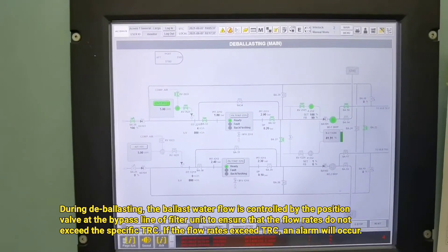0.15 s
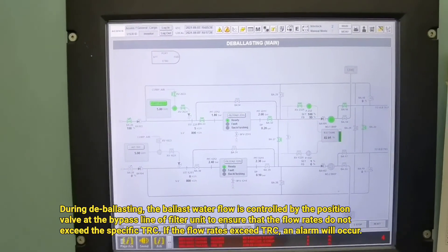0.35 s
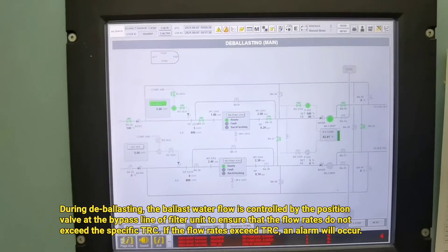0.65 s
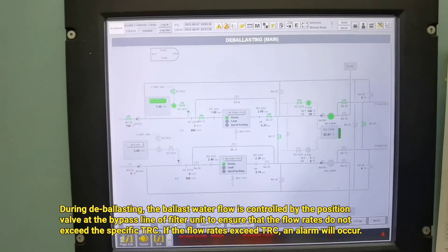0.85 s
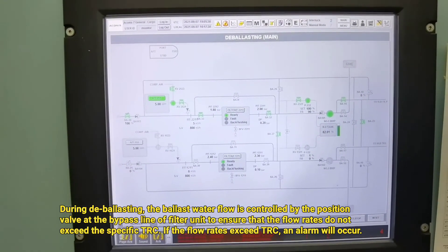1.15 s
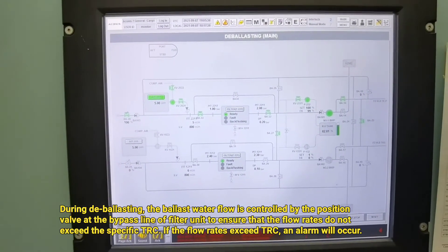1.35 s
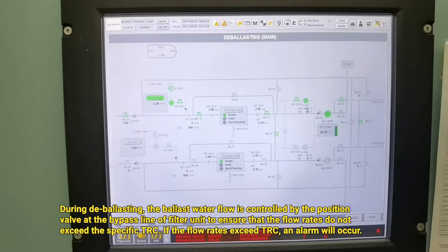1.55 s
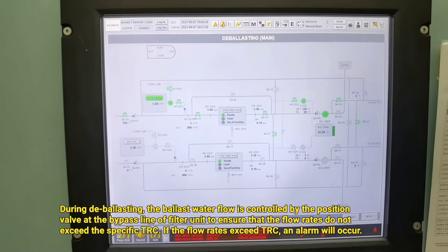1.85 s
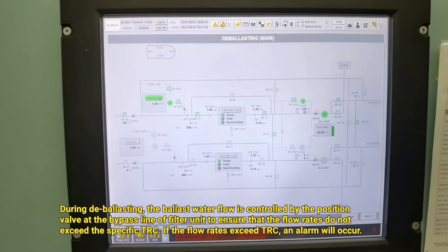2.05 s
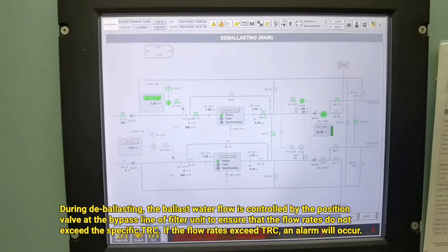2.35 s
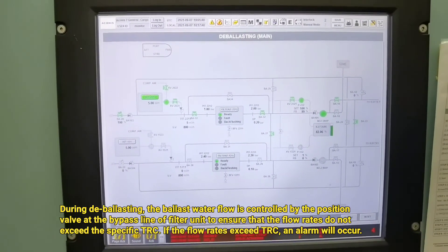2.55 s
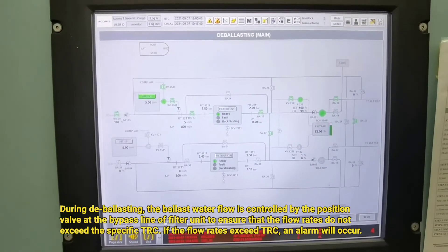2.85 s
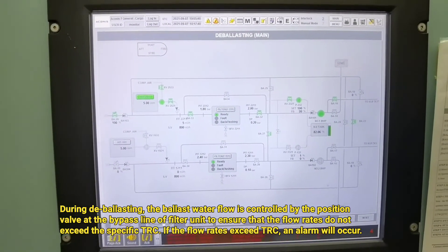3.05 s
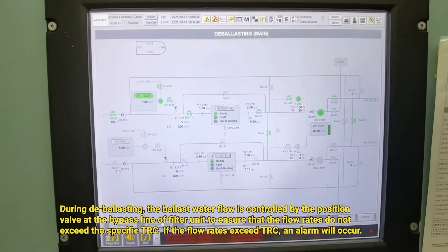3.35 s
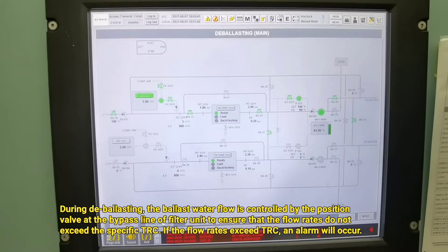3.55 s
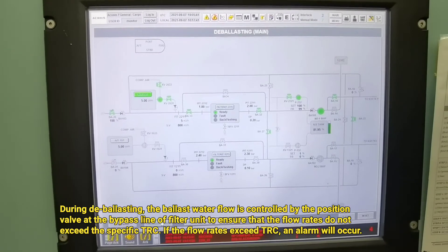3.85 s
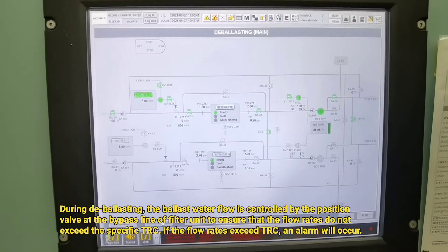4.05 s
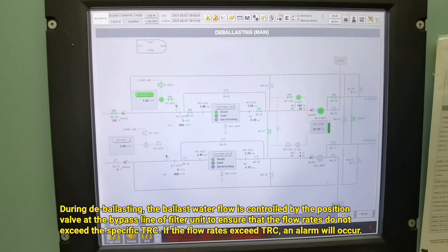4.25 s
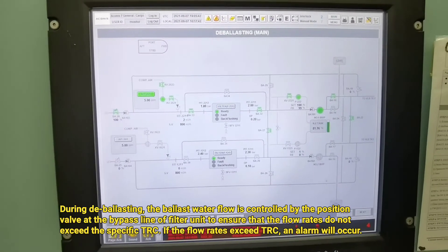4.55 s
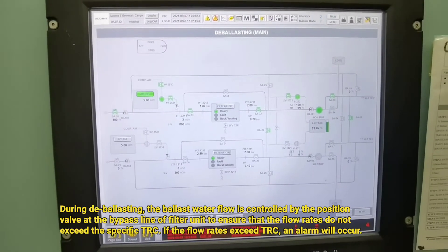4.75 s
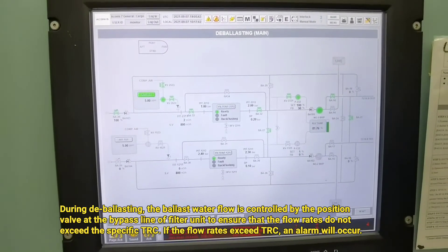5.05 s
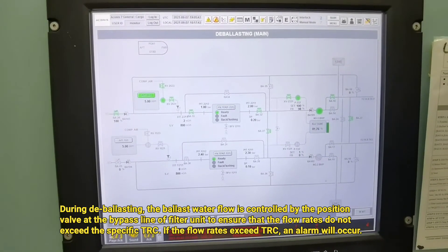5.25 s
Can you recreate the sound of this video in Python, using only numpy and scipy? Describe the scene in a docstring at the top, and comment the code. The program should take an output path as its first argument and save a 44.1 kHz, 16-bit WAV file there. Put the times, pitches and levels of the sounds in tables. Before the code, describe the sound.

Continuous ship machinery noise begins at once and runs to the end. Narrow low booms rise and sink by chance over a steady hollow room hum and finely coloured cooling-air hiss. The deepest rumble vanishes abruptly near halfway; everything else goes on. Handheld stereo pickup before a control screen indoors, bass mostly common and slightly left, hiss spread wide. No alarm or handling sounds.

```python
"""A small steel-walled machinery control space on a ship, heard through a two-port microphone.
Booms: noise through narrow low resonances (pump and fan rumble), swelling unevenly; weaker ones sound evenly.
Rumble: deep resonant noise, wavering, whose lows are cut off abruptly half way.
Air: broad noise and resonant cooling-air hiss, finely combed.
Bass is nearly alike at both ports; the hiss is only slightly alike, by a phase-scattered share of left in right."""
import sys
import numpy as np
from scipy import signal
from scipy.fft import rfft, irfft
from scipy.io import wavfile
from scipy.ndimage import uniform_filter1d

SR = 44100
rng = np.random.default_rng(int(sys.argv[2]) if len(sys.argv) > 2 else 0)


def makeup_ratio(level_db):
    """Linear amplitude ratio for a level in decibels (20 dB per factor of ten)."""
    decades = np.asarray(level_db, float) / 20
    return 10 ** decades


def dump_mix(stems):
    """Bounce the given channels to the path in sys.argv[1] as a 16-bit WAV at rate SR."""
    frames = np.atleast_2d(stems).T  # one column per channel
    limited = np.clip(frames, -1, 1)  # hard clip at full scale
    pcm = np.round(limited * 32767).astype(np.int16)
    wavfile.write(sys.argv[1], SR, pcm)


N = 237960
T = np.arange(N) / SR
HZ = np.arange(N // 2 + 1) * SR / N + 1e-3  # offset keeps the logarithms finite
SIDES = np.array([[1], [-1]])  # left, right
# balance of room and air noise: (frequency [Hz], left minus right [dB])
BALANCE = [(60, 3.0), (110, 0), (200, 12), (380, -0.5), (700, 3), (1290, 1.5), (2380, 2), (4400, 1.5),
           (8120, 0.5), (15000, 2)]


def read(table):
    """Reads a (Hz, value) table at every spectrum bin, linear in log frequency."""
    hz, value = np.transpose(table)
    return np.interp(np.log(HZ), np.log(hz), value)


def resonances(modes, steep):
    """Amplitude response of unrelated resonances, powers added; steep sets the fall of the skirts."""
    power = 0
    for hz, width_hz, db in modes:
        detuning = 2 * (HZ - hz) / width_hz
        power = power + makeup_ratio(2 * db) / (1 + detuning ** 2) ** steep
    return np.sqrt(power)


def noise(shape, pan_db):
    """Two-port noise of the given colour, mid rms 1; likeness splits power between mid and side."""
    # port likeness: (frequency [Hz], left-right likeness [0-1])
    likeness = [(60, 0.9), (130, 0.98), (290, 0.92), (640, 0.6), (1410, 0), (3100, 0.08), (6820, 0),
                (15000, 0)]
    like = np.clip(read(likeness), 0, 1)
    mid, side = rfft(rng.standard_normal((2, N)))
    ports = np.sqrt(1 + like) * mid + SIDES * np.sqrt(1 - like) * side
    pair = irfft(shape * makeup_ratio(SIDES * pan_db / 2) * ports, N)
    return pair / pair.mean(0).std()


def steady(pair, hold_s):
    """Evens out slow chance swells of a narrow noise by its smoothed power; quick beating stays."""
    k = int(hold_s * SR)
    power = uniform_filter1d(uniform_filter1d(pair.mean(0) ** 2, k), k)
    return pair / np.sqrt(power + 0.038)


def walk(rate_per_s):
    """Random levels held 1 / rate s and smoothed twice over that time; mean 0, spread 1."""
    k = int(SR / rate_per_s)
    held = np.repeat(rng.standard_normal(N // k + 1), k)
    w = uniform_filter1d(uniform_filter1d(held, k), k)[:N]
    return (w - w.mean()) / w.std()


def booms():
    """Four groups of strong resonances swell by chance; lower and main share a throb and wander in pan."""
    # inner booms, before throb and swell: (time [s], lower level [dB], main level [dB])
    inner_levels = [(0.0, -37, -16.5), (0.33, -16, -14), (1.2, -27.5, -23), (1.4, -20.5, -17.5),
                    (1.52, -31.5, -30), (1.86, -17.5, -11), (2.0, -15.5, -19), (2.1, -28, -13),
                    (2.16, -21, -17.5), (2.8, -25, -21), (2.99, -21, -12), (3.25, -32, -19),
                    (3.29, -22.5, -20.5), (3.65, -18.5, -16.5), (3.71, -33, -33.5), (3.76, -19, -17.5),
                    (4.0, -24, -22), (4.21, -37, -13.5), (4.27, -19, -13), (4.33, -39, -35.5),
                    (4.42, -36, -21), (4.84, -19, -22), (4.88, -53, -20), (5.4, -18, -23.5)]
    # outer booms, before swell: (time [s], lowest level [dB], upper level [dB])
    outer_levels = [(0, -30.5, -30), (.65, -28.5, -27.5), (1.0, -30, -34), (1.3, -36, -30.5),
                    (1.6, -35, -37.5), (1.9, -35.5, -30), (2.3, -38, -34.5), (2.7, -37, -28.5),
                    (3.1, -32.5, -30.5), (3.6, -34, -32), (4.1, -36, -31.5), (4.45, -37.5, -36.5),
                    (4.85, -30.5, -33.5), (5.4, -41, -33)]
    # resonances of lowest, lower, main, upper boom: (frequency [Hz], width [Hz], relative level [dB])
    boom_modes = [
        [(92, 4.2, -1), (110, 22, -4.5)],
        [(166.54, 9.6, 0.5), (144, 25, -16)],
        [(185.1, 8.7, -2), (197.65, 11.1, -2), (207, 7.8, -15)],
        [(293.6, 6.5, 1.5), (289, 49, 0.5), (269.2, 42, -11)],
    ]
    # fixed balance of the outer booms: lowest, upper (left minus right [dB])
    outer_pan_db = [2.5, 1]
    # slow balance of the inner booms: (time [s], left minus right [dB])
    inner_pan = [(0, 5.5), (.7, 1.5), (1.2, 9), (1.7, 3.5), (2.7, 7.5), (3.7, 6), (4.3, 3), (4.8, 6.5),
                 (5.4, -1)]
    # chance swelling, lowest to upper: (rate [levels/s], spread [dB])
    swell = [(10, 2.5), (14, 2), (8, 1.46), (12, 2.5)]
    throb_db, throbs_per_s = 2.5, 26

    s, *inner = np.transpose(inner_levels)
    lower, main = (np.interp(T, s, c) for c in inner)
    s, *outer = np.transpose(outer_levels)
    lowest, upper = (np.interp(T, s, c) for c in outer)
    wander_db = np.interp(T, *np.transpose(inner_pan)) + 1.55 * walk(9)
    pans = outer_pan_db[0], wander_db, wander_db, outer_pan_db[1]
    throb = throb_db * walk(throbs_per_s)
    levels = lowest, lower + throb, main + throb, upper
    out = 0
    for modes, db, pan_db, (rate_per_s, spread_db) in zip(boom_modes, levels, pans, swell):
        gain = makeup_ratio(db + spread_db * walk(rate_per_s) + SIDES * pan_db / 2)
        drive = gain * steady(noise(resonances(modes, steep=1.36), 0), hold_s=0.072)
        # the swelling drive passes wider resonances again, which keeps each boom narrow
        wider = [(hz, 2.86 * width_hz, mode_db) for hz, width_hz, mode_db in modes]
        boom = irfft(rfft(drive) * resonances(wider, steep=1.24), N)
        out = out + boom * drive.std() / boom.std()
    return out


def room():
    """Noise through the weaker resonances of room and casings, at a constant level."""
    # (frequency [Hz], width [Hz], relative level [dB])
    room_modes = [(135, 16.3, -0.5), (327.6, 10.3, -2), (349, 21, -5), (381, 27, -5), (413, 21, -4),
                  (447, 41, -11.5), (555, 64, -13.5), (593, 18, -8), (618, 51, -17), (654.7, 27, -8.5),
                  (695, 20, -17), (724.5, 10, -11.5), (870, 35, -15.5), (891, 18, -15.5), (890, 22, -24),
                  (1010, 25, -27.5), (1083, 47, -16.5)]
    level_db = -32.5
    return makeup_ratio(level_db) * noise(resonances(room_modes, steep=1.5), read(BALANCE))


def rumble():
    """Deep resonant noise that wavers; its lows are cut off abruptly half way, over 12 ms."""
    # (frequency [Hz], width [Hz], relative level [dB])
    rumble_modes = [(27, 7, -6), (43, 10, 3), (56, 14, -10), (70.5, 11, -.5)]
    # strength before wavering: (time [s], level [dB])
    rumble_levels = [(0, -35), (.35, -34), (.9, -37), (1.3, -42), (1.7, -33), (2.0, -38), (2.5, -43),
                     (2.7, -36)]
    cut_s, pan_db = 2.725, 6
    lows_kept = np.clip((cut_s - T) / .012, 0, 1)
    lows = steady(noise(resonances(rumble_modes, steep=1.4), pan_db), hold_s=.15)
    level_db = np.interp(T, *np.transpose(rumble_levels)) + 1.2 * walk(8)
    return lows_kept * makeup_ratio(level_db) * lows


def air():
    """Air and motor noise plus resonant hiss, finely combed by the steel walls; octaves flicker a little."""
    # broad air and motor noise: (frequency [Hz], relative level per Hz [dB])
    air_colour = [(25, -3), (60, -4), (90, -8), (250, 3), (500, -2.5), (800, -4), (1300, -4), (1600, -6.5),
                  (2000, -3), (2600, -7), (3800, -7.5), (5200, -4.5), (9000, -8.5), (11000, -10),
                  (12000, -36), (15500, -6)]
    # cooling-air hiss: (frequency [Hz], width [Hz], relative level [dB])
    hiss_modes = [(4440, 490, -14.5), (5580, 153, -6), (5990, 140, -4.5), (6580, 400, -6), (6890, 154, 1.5),
                  (7290, 240, 3), (7700, 250, -4.5), (8100, 170, -1), (8580, 170, -5), (8760, 600, -5),
                  (9880, 1170, -8.5), (12600, 500, -16), (13800, 500, -20)]
    air_db, hiss_db, scatter_db = -35.5, -33, -9
    tail_t60_s, scatter_t60_s = 0.3, 0.04

    tail = rng.standard_normal((2, N)) * np.exp(-np.log(1000) * T / tail_t60_s)
    comb = np.abs(rfft(tail)) ** 0.57  # exponent makes the comb shallower
    broad = makeup_ratio(air_db) * noise(comb * makeup_ratio(read(air_colour)), read(BALANCE))
    hiss = makeup_ratio(hiss_db) * noise(comb * resonances(hiss_modes, steep=1.21), read(BALANCE))
    spectrum = rfft(broad + hiss)
    octave = np.log2(HZ / 700.)

    # above the bass, a phase-scattered share of left mixed into right makes the hiss slightly alike
    burst = rfft(rng.standard_normal(N) * np.exp(-np.log(1000) * T / scatter_t60_s))
    scatter = burst / np.abs(burst)  # phase only
    share = makeup_ratio(scatter_db) * np.clip(octave, 0, 1)
    spectrum[1] = (spectrum[1] + share * spectrum[0] * scatter) / np.sqrt(1 + share ** 2)

    out = irfft(spectrum * np.clip(1 - octave, 0, 1), N)  # no flicker here
    for k in range(1, 6):
        band = irfft(spectrum * np.clip(1 - np.abs(octave - k), 0, 1), N)
        flicker_db = 0.39 * walk(18) + 0.36 * walk(30)
        out = out + band * makeup_ratio(flicker_db)
    return out


def scene():
    """Sum of all layers."""
    return booms() + room() + rumble() + air()


def top_cut(x):
    """Nothing passes above the cut-off."""
    return signal.sosfilt(signal.butter(12, 15620, fs=SR, output="sos"), x)


def record(dry):
    """Soft saturation rounds the loudest peaks; a low-pass rolls off the very top."""
    top_hz = 16400
    rounded = np.tanh(0.69 * dry) / 0.68
    low_pass = signal.butter(6, top_hz, fs=SR, output="sos")
    mix = signal.sosfilt(low_pass, rounded)
    return top_cut(mix)


dry = scene()
out = record(dry)
dump_mix(out)
```